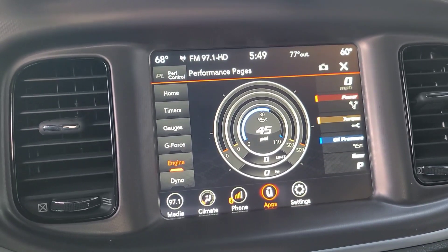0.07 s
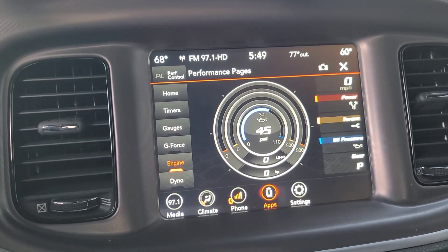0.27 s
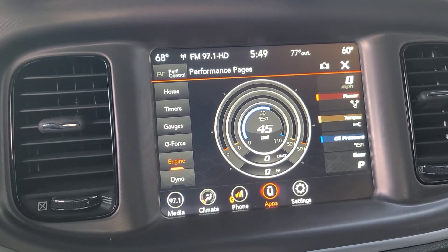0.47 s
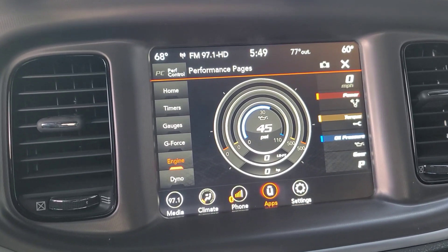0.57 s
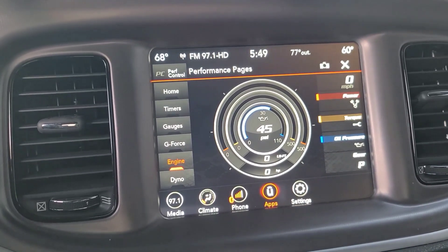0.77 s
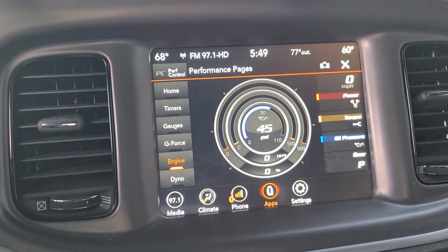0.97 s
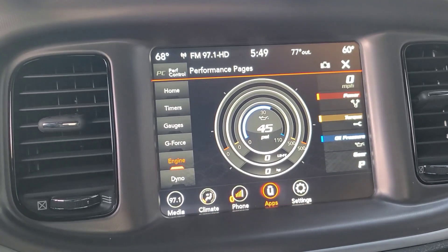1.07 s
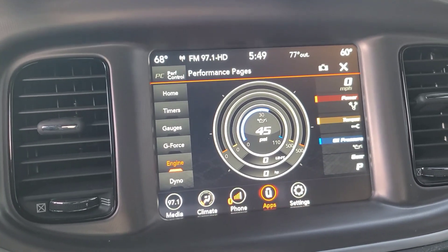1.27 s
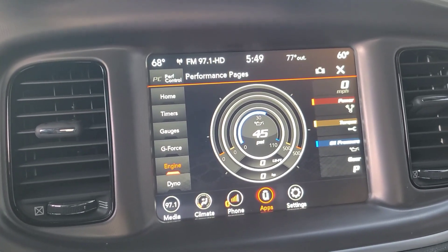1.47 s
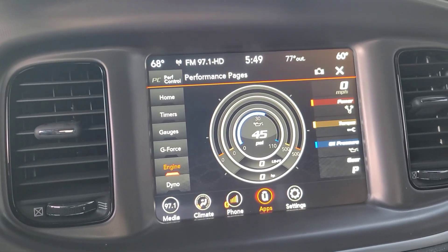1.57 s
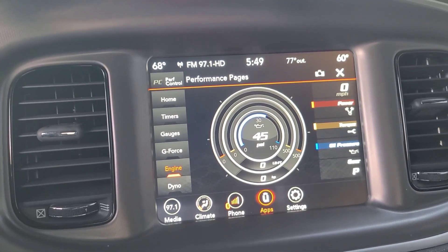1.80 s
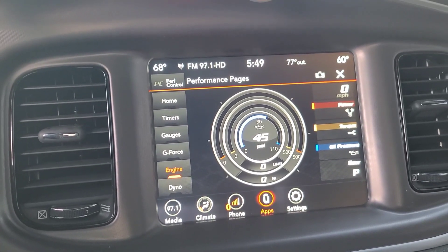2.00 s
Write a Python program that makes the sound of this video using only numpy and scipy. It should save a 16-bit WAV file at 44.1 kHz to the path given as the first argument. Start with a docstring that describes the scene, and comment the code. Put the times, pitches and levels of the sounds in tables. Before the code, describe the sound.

Inside a parked car, a deep engine flares up briefly and falls back to a rumbling idle

```python
"""Throttle blip inside a parked car

An eight-cylinder engine is heard in the cabin: the throttle is blipped, the revs flare and sink to idle.
A firing tone carries the engine; its uneven cylinders add other orders and a chugging valve clatter.
The cabin's resonances make the orders and the rumble boom.
Filtered noise makes the hiss of the vents, the buffeting at two microphone ports,
and short rasps and an airy rush around the blip."""
import sys
import numpy as np
from scipy import signal
from scipy.fft import rfft, irfft
from scipy.io import wavfile
from scipy.ndimage import uniform_filter1d

SR = 44100
rng = np.random.default_rng(int(sys.argv[2]) if len(sys.argv) > 2 else 0)


def invert_db(x):
    """Field ratio 10**(x/20) for x, a level in decibels (scalar or array-like)."""
    u = np.asarray(x, float) / 20
    return 10 ** u


def wav_record(signal):
    """Record a signal, one row per channel, as 16-bit PCM in the file named by sys.argv[1]."""
    frames = np.transpose(np.atleast_2d(signal))
    bounded = np.clip(frames, -1, 1)
    # unit amplitude maps onto the largest positive 16-bit level
    quanta = np.round(bounded * 32767).astype(np.int16)
    wavfile.write(sys.argv[1], SR, quanta)


N = 89919
T = np.arange(N) / SR  # time of each sample, in seconds


def evened(x):
    """Scales a sound to rms 1."""
    return x / np.sqrt(np.mean(x ** 2) + 1e-20)


def read(points, hz):
    """Reads a table of (frequency, value) along a logarithmic frequency axis."""
    f, value = np.transpose(points)
    return np.interp(np.log(hz + 1), np.log(f + 1), value)


def curve(table, index):
    """Reads one column of a table whose first column is time, at every sample."""
    rows = np.array(table)
    return np.interp(T, rows[:, 0], rows[:, index])


def slow_drift(fastest_hz):
    """Slow random wandering of about rms 1: a sum of sines, the slower ones stronger."""
    coarse = np.arange(0, T[-1] + 1, 0.005)
    speeds = np.geomspace(0.8, fastest_hz, num=16)
    drift = sum(np.sin(2 * np.pi * (f * coarse + rng.random())) / np.sqrt(f) for f in speeds)
    return np.interp(T, coarse, evened(drift))


def cabin(hz):
    """Gain of the cabin and exhaust: each resonance lifts a band around its own frequency."""
    # resonances: (centre [Hz], width [Hz], peak gain [dB])
    resonances = [(55.5, 9, 2), (99, 13, -2), (158, 22, -1.5), (208, 25, -8), (280, 24, -10),
                  (372, 10, -11), (420, 16, -20), (468.5, 34, -18), (585, 43, -24.5), (702, 20, -22),
                  (840, 30, -25)]
    floor_db = -19.5  # gain between the resonances, at the low end
    power = sum(invert_db(2 * db) / (1 + (2 * (hz - f) / width) ** 2) for f, width, db in resonances)
    floor = invert_db(2 * floor_db) / (1 + (hz / 300) ** 2)
    return np.sqrt(power + floor)


def ports(left, other, gain, likeness=1):
    """Colours noise and spreads it over two ports, which differ in level, phase and content by frequency."""
    # how alike the two ports are: (frequency [Hz], likeness [0 to 1])
    alike = [(60, 1), (350, 0.83), (860, 0.5), (1380, 0.64), (1900, 1), (2400, 0.43), (3400, 0.27),
             (5000, 0.23), (12000, .1)]
    # how far the left port is ahead: (frequency [Hz], phase [radians])
    phase_lead = [(0, 1), (344, 0.5), (690, -0.66), (860, 1.64), (1210, 5), (1380, 5), (1550, 4),
                  (1900, 7.5), (2400, 6.5), (2900, 9), (16000, 48.5)]
    # how much louder the left port is: (frequency [Hz], level [dB])
    left_lean = [(60, .5), (200, 3), (330, 1), (660, -2.5), (930, -1), (1310, -7), (1850, -8), (2600, -8),
                 (3100, -5.5), (3700, -7), (4200, -11), (4800, -17), (5700, -14), (6700, -10.5),
                 (7300, -17), (8000, -22), (8800, -14), (9400, -5), (10300, -1.5), (13000, 0)]
    hz = np.fft.rfftfreq(N, 1 / SR)
    same = likeness * np.clip(read(alike, hz), 0, 1)
    a = rfft(left)
    b = same * a + np.sqrt(1 - same ** 2) * rfft(other)
    b = b * np.exp(-1j * np.interp(hz, *np.transpose(phase_lead)))
    lean = invert_db(read(left_lean, hz) / 2)  # half the difference goes to each side
    return evened(irfft(np.array([a * lean, b / lean]) * gain(hz), N))


def ripple():
    """A fixed, fine random pattern of peaks and dips over frequency, absent in the bass, fading in the treble."""
    depth_db, spacing_hz, fade_hz = 2.5, 25, 4500
    hz = np.fft.rfftfreq(N, 1 / SR)
    bins = max(round(spacing_hz * N / SR), 1)
    bumps = rng.standard_normal(len(hz))
    bumps = evened(uniform_filter1d(uniform_filter1d(bumps, bins), bins))
    fade_in = np.clip(hz / 400 - 1, 0, 1)
    fade_out = 1 / (1 + (hz / fade_hz) ** 2)
    return invert_db(depth_db * bumps * fade_in * fade_out)


def engine(fine):
    """Firing tone, orders of the uneven cycle, rumble through the cabin, and valve clatter gated by each firing."""
    # revs and main tone: (time [s], firing rate [Hz], tone level before its waver [dB])
    revs = [(0, 100, -7), (.03, 105.7, -7.5), (.052, 115, -12.5), (.07, 125, -30), (.114, 149.7, -24),
            (.165, 166.9, -24), (.21, 163.9, -25), (.36, 145.4, -28), (.45, 133.6, -30), (.5, 128, -25),
            (.62, 117.5, -22.5), (.71, 111.6, -24.5), (.81, 105.6, -18), (.89, 101, -15), (1.0, 99.8, -17),
            (1.12, 96.3, -18), (1.18, 93, -20), (1.22, 90.6, -24.5), (1.35, 83, -25.5), (1.38, 81.1, -34),
            (1.41, 79, -26), (1.49, 72.2, -36), (1.61, 69.4, -29), (1.69, 66.5, -38), (1.73, 65.1, -23),
            (1.76, 64.2, -31), (1.81, 62.6, -20), (1.85, 62.6, -28), (1.9, 62.6, -19), (1.945, 62.6, -28),
            (2.0, 62.6, -19.5), (2.04, 63.9, -19)]
    # the rest of the engine: (time [s], orders level [dB], rumble level [dB], clatter level [dB])
    load = [(0, -36, -30, -41), (.04, -34, -31, -40), (.07, -33, -30, -39), (.11, -33, -31, -41),
            (.22, -30, -30.5, -45), (.3, -29, -30, -42.5), (.45, -30, -32, -41), (.6, -30, -31, -42),
            (.75, -29, -35.5, -44), (.9, -31, -36.5, -46), (1.05, -36, -38, -48), (1.2, -38, -38, -47),
            (1.34, -37, -39, -48), (1.41, -31, -39, -49), (1.47, -36, -40, -50), (1.54, -33, -41, -50),
            (1.67, -39, -41, -50), (1.8, -33, -39, -51), (1.92, -33, -37, -51), (2.04, -31, -38, -52)]
    # orders beside the firing tone, which is the eighth: (multiple of the engine cycle, relative level [dB])
    order_levels = [(2, -6), (3, 6), (4, 6), (5, -3), (6, 4), (7, -2), (9, 3), (10, 2), (11, 1), (12, 0),
                    (13, -9), (14, -6), (15, -11), (16, -4), (17, -9), (18, -14), (19, -7), (20, -11),
                    (21, -10), (22, -12), (23, -11), (24, -10)]
    # colour of the rumble before the cabin: (frequency [Hz], relative level per Hz [dB])
    rumble_colour = [(20, -22.5), (40, -9.5), (150, -1), (300, 1.5), (600, -4), (1000, -12.5), (2000, -77)]
    # colour of the valve clatter: (frequency [Hz], relative level [dB])
    clatter_colour = [(200, -23), (500, 2), (780, -5), (845, 2.5), (930, -11), (1050, -6), (1150, -9),
                      (1260, -11), (1370, -2.5), (1480, -1.5), (1620, -6), (1750, -8.5), (1850, -9.5),
                      (2020, -6.5), (2170, -12.5), (3000, -16.5), (4000, -25), (6000, -37), (7000, -51),
                      (10000, -83)]
    # clatter of each cylinder in firing order: relative level [dB]
    cylinder_levels = [2, -2, -17, -1, -9, 3.5, -17, -5.5]
    tone_waver_db, order_waver_db, waver_hz = 1.2, 1.5, 9
    left_over_right_db = 0.35
    tick_share, tick_decay = 0.42, 0.27  # the decay is in firings

    cylinders = len(cylinder_levels)
    hz = curve(revs, index=1)
    firings = np.cumsum(hz) / SR  # running count of firings
    tone_db = curve(revs, index=2) + tone_waver_db * slow_drift(waver_hz)
    tone = np.sqrt(2) * invert_db(tone_db) * np.cos(2 * np.pi * firings)

    orders = np.zeros(N)
    for k, db in order_levels:
        level = invert_db(db + order_waver_db * slow_drift(waver_hz)) * cabin(hz * k / cylinders)
        orders += level * np.cos(2 * np.pi * (firings * k / cylinders + rng.random()))
    hum = tone + invert_db(curve(load, index=1)) * orders
    hum = hum * invert_db(left_over_right_db / 2 * np.array([[1], [-1]]))

    a, b, c, d = rng.standard_normal((4, N))
    rumble = ports(a, b, lambda f: fine * cabin(f) * invert_db(read(rumble_colour, f)))
    rumble = invert_db(curve(load, index=2)) * rumble

    # every firing starts a tick that dies away before the next
    tick_level = invert_db(cylinder_levels)[firings.astype(int) % cylinders]
    ticks = tick_level * np.exp(-(firings % 1) / tick_decay)
    gate = 1 - tick_share + tick_share * evened(ticks)
    clatter = ports(c * gate, d * gate, lambda f: fine * invert_db(read(clatter_colour, f)))
    clatter = invert_db(curve(load, index=3)) * clatter
    return hum + rumble + clatter


def vents(fine):
    """Air noise: the blower's hiss, and lumpy low buffeting made separately for each port."""
    # colour of the hiss: (frequency [Hz], relative level [dB])
    hiss_colour = [(300, 2.5), (700, -9.5), (1000, -7), (1200, -13), (1420, -14.5), (1620, 4), (2020, 3.5),
                   (2200, -7), (3200, -5), (4150, -13.5), (6150, -16.5), (6600, -24), (7300, -22),
                   (7900, -23), (8250, -19), (8500, -23), (8900, -25), (10000, -29), (11500, -35),
                   (13000, -47.5), (15700, -67)]
    # rise and fall of the hiss: (time [s], level above the base level [dB])
    hiss_course = [(0, 5.5), (.12, 2), (.25, 0), (.38, 5.5), (.6, 3), (1.1, 1), (1.5, 2.1), (2.04, 3.6)]
    # colour of the buffeting: (frequency [Hz], relative level [dB])
    buffet_colour = [(10, -20), (30, -3), (45, 0), (62, -2), (80, -6), (100, -8), (140, -14), (250, -25),
                     (400, -36.5), (1000, -80), (3000, -110)]
    # gusts: (time [s], buffeting level [dB])
    gusts = [(0, -29), (.15, -39.5), (.55, -28.5), (.65, -37), (.85, -28), (1.05, -31.5), (1.3, -33),
             (1.4, -39), (1.5, -28.5), (1.66, -34), (1.75, -29.5), (1.9, -23), (2.04, -34)]
    hiss_base_db = -53.5
    lump_db, fastest_lump_hz = 2, 19

    a, b, c, d = rng.standard_normal((4, N))
    hiss = ports(a, b, lambda f: fine * invert_db(read(hiss_colour, f)))
    hiss = invert_db(hiss_base_db + curve(hiss_course, index=1)) * hiss
    lumps = invert_db(lump_db * np.array([slow_drift(fastest_lump_hz), slow_drift(fastest_lump_hz)]))
    buffeting = evened(lumps * ports(c, d, lambda f: invert_db(read(buffet_colour, f)), likeness=0))
    return hiss + invert_db(curve(gusts, index=1)) * buffeting


def rasps(fine):
    """Noise bursts in bands: raspy as the throttle snaps open, and an airy rush after it shuts."""
    # bursts: (start [s], level [dB], centre [Hz], time to fall by 60 dB [s])
    bursts = [(0.033, -40, 3000, .04), (.037, -33, 700, .04), (0.056, -28, 1900, 0.03),
              (.062, -26, 1400, 0.035), (0.074, -28, 1650, 0.035), (0.083, -33, 1400, 0.06),
              (.028, -38, 1450, 0.3), (.02, -38, 750, .25), (.265, -55.5, 4120, 0.89)]
    width = 0.65  # of the centre frequency
    rise_s = 0.0015
    out = np.zeros((2, N))
    for start, db, hz, t60 in bursts:
        t = np.maximum(T - start, 0)
        left, other = rng.standard_normal((2, N))
        band = ports(left, other, lambda f: fine / (1 + (2 * (f - hz) / (width * hz)) ** 2) ** 2)
        shape = np.minimum(t / rise_s, 1) * invert_db(-60 * t / t60)
        out += invert_db(db) * evened(shape * band) * np.sqrt(np.mean(shape ** 2))
    return out


def scene():
    """Everything in the cabin; all noises but the buffeting share one fine pattern over frequency."""
    fine = ripple()
    return engine(fine) + rasps(fine) + vents(fine)


def roll_off(x):
    """The treble ends steeply here."""
    return signal.sosfilt(signal.butter(12, 15750, fs=SR, output="sos"), x)


def record(dry):
    """The microphone rolls off the deep bass and adds faint noise of its own."""
    low_hz, noise_db = 22.4, -88
    bass_cut = signal.butter(1, low_hz, "high", fs=SR, output="sos")
    heard = signal.sosfiltfilt(bass_cut, dry)  # run both ways, so the cut counts twice
    heard = heard + invert_db(noise_db) * rng.standard_normal(N)
    return roll_off(heard)


dry = scene()
out = record(dry)
wav_record(out)
```